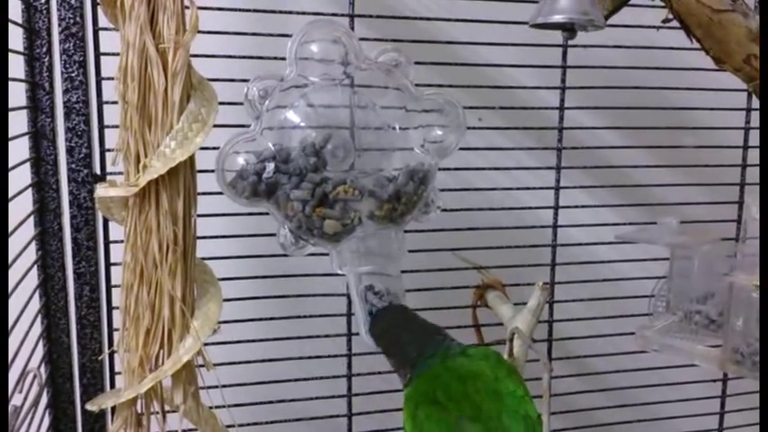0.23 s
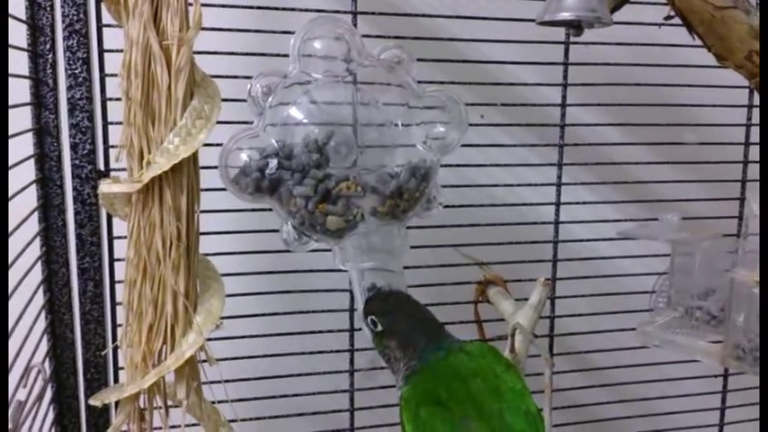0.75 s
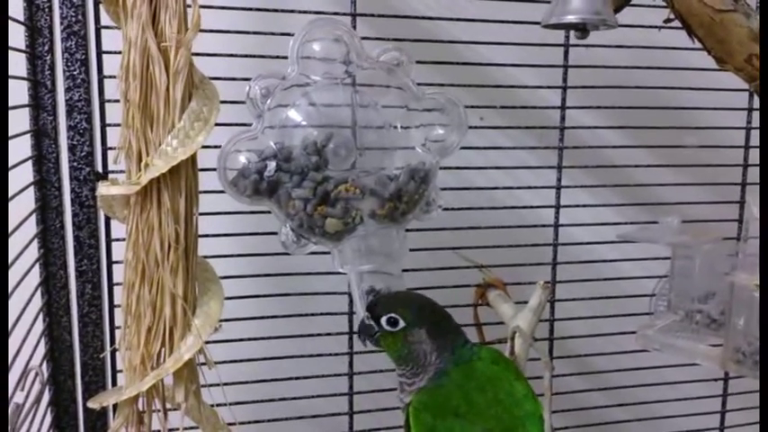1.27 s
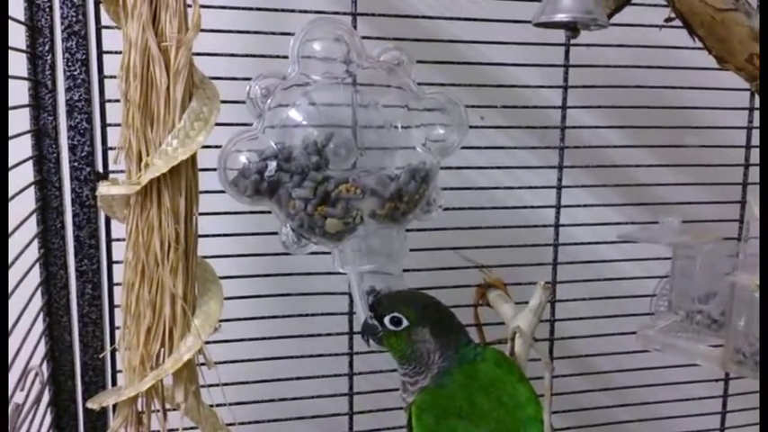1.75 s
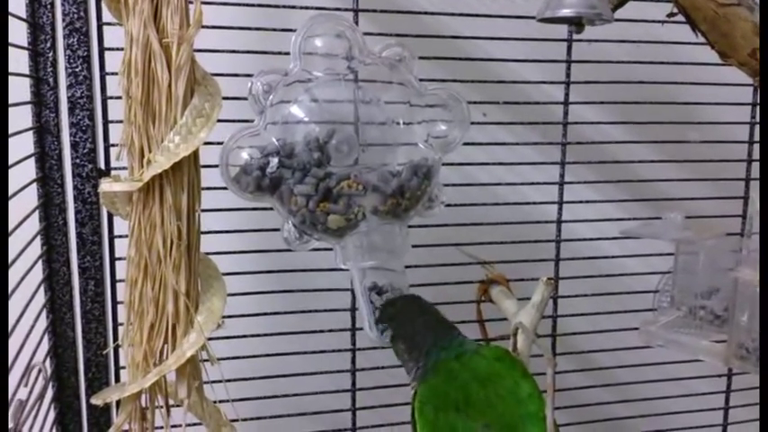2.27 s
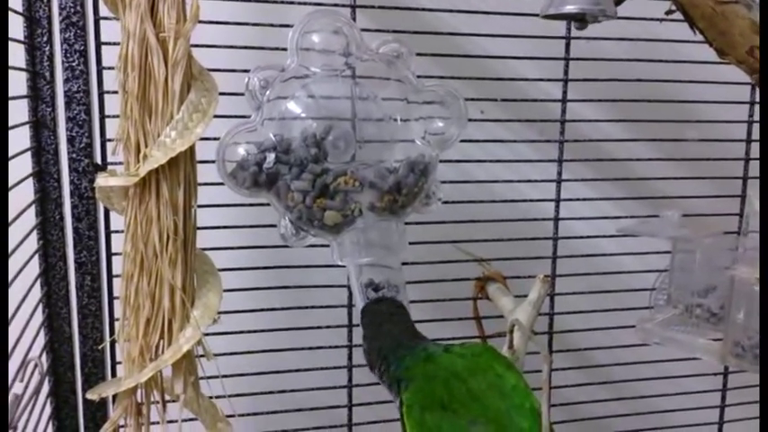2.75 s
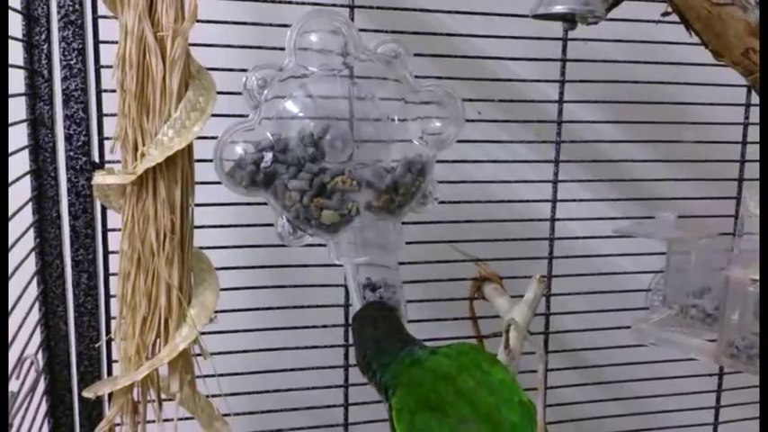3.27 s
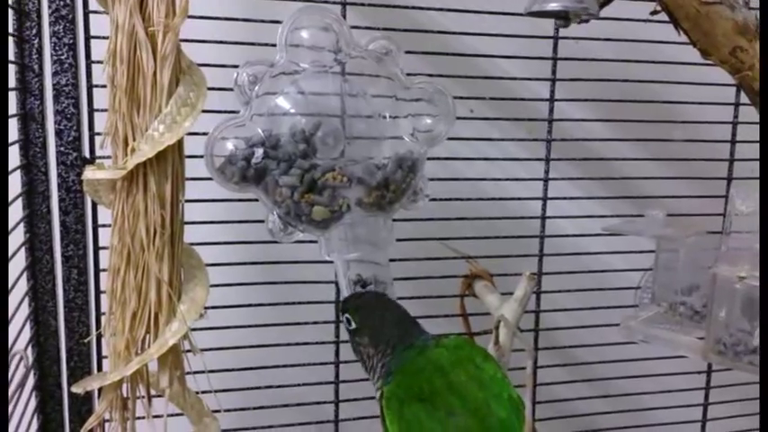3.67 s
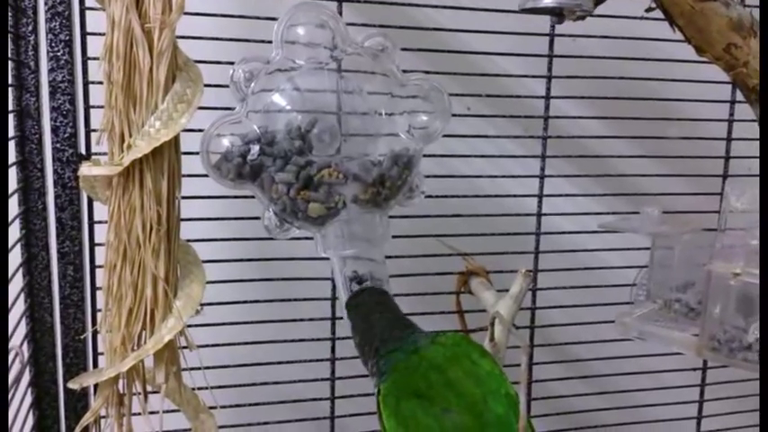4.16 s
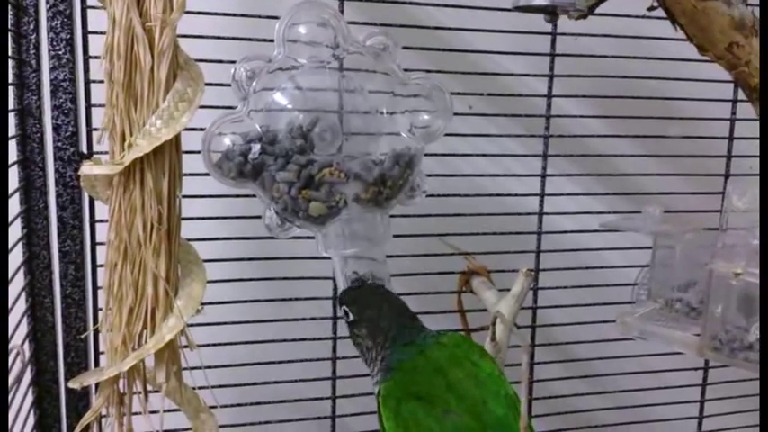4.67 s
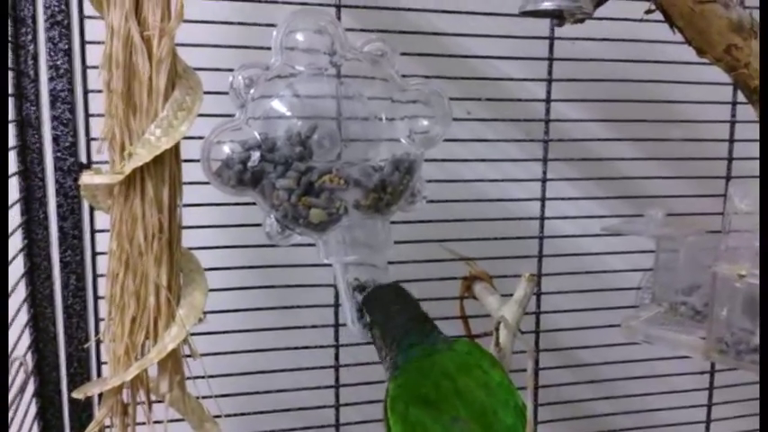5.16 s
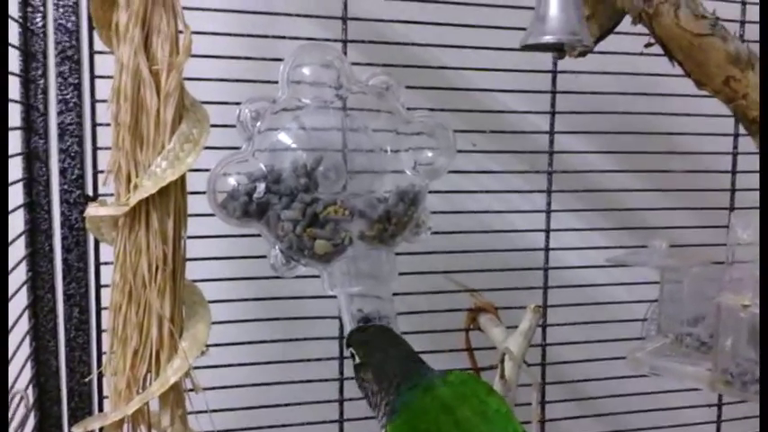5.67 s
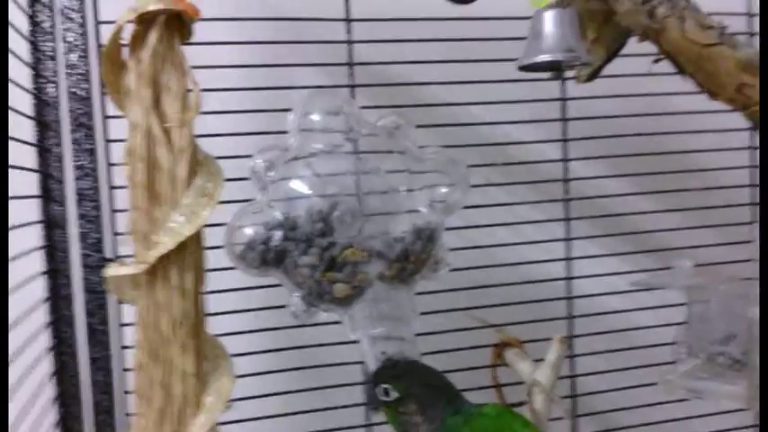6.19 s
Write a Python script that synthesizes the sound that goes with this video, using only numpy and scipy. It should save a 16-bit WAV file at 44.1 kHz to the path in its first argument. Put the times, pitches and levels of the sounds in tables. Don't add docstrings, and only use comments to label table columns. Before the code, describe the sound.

A small parrot bites a pellet-filled plastic toy in an indoor cage, gives one harsh squawk, while pellets rattle and wind pops hit the left.

```python
import sys
import numpy as np
from scipy import signal
from scipy.fft import rfft, irfft
from scipy.io import wavfile

SR = 44100
rng = np.random.default_rng(int(sys.argv[2]) if len(sys.argv) > 2 else 0)


def dump(signal):
    limited = np.clip(np.atleast_2d(signal).T, -1, 1)
    pcm = np.round(limited * 32767).astype(np.int16)
    wavfile.write(sys.argv[1], SR, pcm)


def boost_factor(decibels):
    exponent = np.asarray(decibels, float) / 20
    return 10 ** exponent


N = 283541

# time in seconds, level in dB.
DRAUGHT_LEVEL = [(0, -50.5), (.44, -51), (.66, -35), (.99, -43.5), (1.3, -53), (1.9, -54), (2.42, -54),
                 (2.72, -43), (2.97, -58.5), (3.85, -38), (4.07, -50), (4.2, -36.5), (4.4, -34),
                 (4.78, -57), (5.06, -36.5), (5.9, -36), (6.2, -34.5), (6.43, -38.5)]


def rms_one(x):
    return x / np.sqrt(np.mean(x ** 2) + 1e-20)


def filtered(x, order, hz, kind):
    return signal.sosfilt(signal.butter(order, hz, kind, fs=SR, output="sos"), x)


def in_time(rows):
    s, *columns = np.transpose(rows)
    return [np.interp(np.arange(N) / SR, s, c) for c in columns]


def at_hz(points, hz):
    known_hz, db = np.transpose(points)
    return np.interp(np.log(hz + 1), np.log(known_hz), db)


def coloured(x, spectrum):
    gain = boost_factor(at_hz(spectrum, np.fft.rfftfreq(N, 1 / SR)))
    return rms_one(irfft(rfft(x) * gain, N))


def drift(rate):
    r = np.exp(-2 * np.pi * rate / SR)
    slow = signal.lfilter([1], [1, -2 * r, r * r], rng.standard_normal(N + SR))
    return rms_one(slow[SR:])


def ring(x, hz, t60):
    r, w = boost_factor(-60 / (t60 * SR)), 2 * np.pi * hz / SR
    return signal.lfilter([0, np.sin(w)], [1, -2 * r * np.cos(w), r * r], x + 1e-18)


def swells(rows, rise_db_per_s):
    t = np.arange(N) / SR
    levels = [db - np.maximum((s - t) * rise_db_per_s, (t - s) * fall_db) for s, db, fall_db in rows]
    return np.max(levels, axis=0)


def short_notes(table):
    t, out, blur = np.arange(N) / SR, np.zeros(N), drift(420.0)
    for k, (s, db, hz, length, husky) in enumerate(table):
        on = slice(round(s * SR), round((s + length) * SR))
        gone = np.linspace(0, 1, len(t[on]))
        shape = np.minimum(gone * length / .003, 1) * np.sqrt(1 - gone)
        swing = 1 - husky + husky * np.roll(blur, k * SR // 7)[on]
        out[on] += boost_factor(db) * shape * swing * np.sin(2 * np.pi * hz * t[on])
    return out


def place(x, pan_db):
    return np.array([np.roll(x, 20) * boost_factor(pan_db / 2), x * boost_factor(-pan_db / 2)])


def hiss():
    # frequency in Hz, level in dB per Hz.
    hiss_spectrum = [(100, -16), (150, -3.5), (300, -6.5), (700, -7.5), (1500, -12.5), (4000, -18.5),
                     (8500, -19.5), (10500, -17), (11800, -20.5), (12500, -30), (15400, -35.5)]
    level_db = -72 + .4 * (in_time(DRAUGHT_LEVEL)[0] + 45.5)
    return boost_factor(level_db) * coloured(rng.standard_normal((2, N)), hiss_spectrum)


def air_pops(level_db):
    # peak in seconds, peak in dB, width in ms, push +1 or suction -1.
    strong = [(0.616, -33.5, 0.2, -1), (0.698, -46, 0.28, 1), (0.7465, -38, 0.71, -1),
              (0.792, -38, 0.28, 1), (0.874, -23, 1, 1), (2.626, -34, 2.74, 1), (2.6555, -39, 1.16, -1),
              (2.696, -40, 1.2, 1), (2.7565, -39.5, 1.2, 1), (3.41, -37, 1.25, -1), (3.4844, -40, 0.67, -1),
              (3.526, -37.5, 2.9, -1), (3.692, -37, 2.4, -1), (3.834, -35.5, 2.7, -1), (3.916, -37, 1.9, 1),
              (4.214, -30, 0.6, -1), (5.0197, -27, 1.9, -1), (5.156, -33.5, 1.5, -1), (5.1895, -25, 2.4, 1),
              (5.2256, -34.5, 0.89, 1), (5.384, -27, 1.28, -1), (5.657, -35.5, 0.7, 1),
              (5.679, -35, 1.1, -1), (5.8402, -26, 1.93, -1), (5.921, -35.5, 1.5, -1),
              (5.9931, -34.5, 1.8, -1), (6.1478, 1, 0.9, 1), (6.2527, -10, 1.5, 1), (6.325, -31.5, 1.3, 1),
              (6.4159, -12.5, 1.36, 1)]
    small = [(u * N / SR, level_db[int(u * N)] - 6 - 6 * v, 0.62 * (.5 + w), p - .5)
             for u, v, w, p in rng.random((40, 4))]
    pops, t = np.zeros(N), np.arange(-SR // 20, SR // 20) / SR
    for s, db, width_ms, push in strong + small:
        u = t / (max(width_ms, .3) / 1000)
        at = round(s * SR) + np.arange(len(t)) - len(t) // 2
        keep = (at >= 0) & (at < N)
        build = .55 * np.exp(-u * u) + .45 * np.exp((1 - np.sqrt(1 + u * u)) / 4.5)
        overshoot = 0.18 * np.exp(-(u / 2.5 - 1.3) ** 2)
        pop = np.where(u < 0, build, np.exp(-u * u)) - overshoot
        pops[at[keep]] += (np.sign(push) * boost_factor(db - 1.5) * pop)[keep]
    return np.minimum(pops, boost_factor(-5.5))


def draught():
    # start in seconds, peak in dB, pitch in Hz,
    # length in seconds, husky share 0-1.
    whistles = [(2.645, -44.5, 594.4, 0.0097, 0.13), (5.262, -46.5, 495, 0.0055, 0.2),
                (5.625, -46.5, 586, 0.0077, 0), (5.653, -42, 561, 0.0067, 0.1),
                (6.078, -45, 554, 0.012, 0.25), (6.102, -41, 493, 0.0074, 0.33),
                (6.203, -44, 520, 0.0085, 0.33)]
    level_db, = in_time(DRAUGHT_LEVEL)
    swing = filtered(drift(25.0) * boost_factor(1.2 * drift(12.0)), 2, 70, "low")
    swing = rms_one(filtered(swing, 1, 14, "high"))
    rumble = rms_one(filtered(drift(90.0) * boost_factor(5.0 * drift(20.0)), 2, [60, 350], "band"))
    left = air_pops(level_db) + short_notes(whistles)
    left = left + boost_factor(level_db - 17.5) * rumble + boost_factor(level_db + 1.0) * swing
    left = left * np.minimum(np.arange(N, 0, -1) / (.006 * SR), 1)
    right = boost_factor(-34.5) * left + boost_factor(level_db - 13.0) * drift(40.0)
    return np.array([left, right])


def room(x):
    # frequency in Hz, time in seconds.
    fade_times = [(300, 0.68), (1500, .6), (4000, 0.52), (10000, 0.46)]
    size = round(1.2 * SR)
    t, white, tail = np.arange(size) / SR, rng.standard_normal((2, size)), 0
    for hz in 250 * 2 ** np.arange(0, 6.5, .5):
        band = filtered(white, 2, [hz / 2 ** .25, hz * 2 ** .25], "band")
        tail = tail + band * boost_factor(-60 * t / at_hz(fade_times, hz))
    tail = tail * np.clip((t - .008) / 0.031, 0, 1)
    tail = tail / np.sqrt((tail ** 2).sum(axis=1, keepdims=True))
    return signal.fftconvolve(x[None], tail, axes=1)[:, :N]


def cage():
    # pitch in Hz, width of the resonance in Hz, level in dB.
    bars = [(320, 18, -7), (485, 15, -6), (646, 18, -2), (772, 20, -3), (1430, 50, -4), (1790, 20, -8),
            (2370, 40, -3), (3510, 30, -4)]
    # jolt in seconds, thrum in dB, dying in dB per second.
    jolts = [
        (0, -48, 51),
        (.095, -41.5, 122),
        (1.02, -50, 345),
        (1.33, -42.5, 87),
        (4.19, -64.5, 32),
    ]
    shake = rng.standard_normal(N)
    thrum = sum(boost_factor(db) * rms_one(ring(shake, hz, 2.2 / width)) for hz, width, db in bars)
    return boost_factor(swells(jolts, 3002)) * rms_one(filtered(thrum, 4, 280, "high"))


def bell():
    # pitch in Hz, level in dB.
    bell_modes = [(7140, -4.5), (8020, -3), (8950, -20), (10200, -20), (11250, -22), (12050, -23)]
    # touch in seconds, level in dB.
    touch_rows = [
        (5.492, -50.5),
        (5.512, -55.5),
        (5.535, -65),
    ]
    touches = np.zeros(N)
    for s, db in touch_rows:
        touches[round(s * SR)] = boost_factor(db)
    return sum(boost_factor(db) * ring(touches, hz, .2) for hz, db in bell_modes)


def pellets():
    # frequency in Hz, level in dB per Hz.
    rattle_spectrum = [(650, -35), (1100, -13.5), (2420, -5.5), (3780, -4), (4310, -9), (5430, -14.5),
                       (7210, -14.5), (10300, -24.5), (11700, -39), (15000, -39.5)]
    # peak in seconds, rattle in dB, settling in dB per second.
    tips = [
        (0.0, -38.5, 55.5),
        (0.81, -30.5, 42),
        (1.0, -21, 164),
        (1.2, -38, 61),
        (1.385, -31, 147.5),
        (3.63, -46.5, 139),
        (4.3, -66, 31.5),
        (5.2, -64, 24.5),
        (5.59, -53.5, 61),
    ]
    level_db = np.maximum(swells(tips, 202.5), -80)
    strength = boost_factor(2.2 * np.minimum(rng.exponential(1, N), 5))
    hit = rng.random(N) < 2500 / SR
    grains = strength * rng.choice([-1, 1], N) * hit
    return boost_factor(level_db - 10) * coloured(grains, rattle_spectrum)


def rasps():
    # start in seconds, peak in dB, length in seconds, tilt in dB per octave, husky share 0-1.
    strokes = [
        (1.144, -41, .09, -5, 0.62),
        (5.345, -73, 0.11, -0.5, 0.8),
        (5.491, -55, 0.104, -1, 0.82),
    ]
    # band of the stem in Hz, level in dB.
    stem_bands = [(1830, -10.5), (2450, 1), (3430, 1), (4500, 6), (5400, -3), (7200, 0)]
    pivot_hz = stem_bands[1][0]
    return short_notes([(s, db + rel_db + tilt_db * np.log2(hz / pivot_hz), hz, length, husky)
                        for s, db, length, tilt_db, husky in strokes for hz, rel_db in stem_bands])


def ringing_notes():
    # start in seconds, peak in dB, pitch in Hz, length in seconds, husky share 0-1.
    tone_rows = [(.305, -48, 3850, 0.0088, 0.64), (.342, -45, 3400, 0.013, 0.5),
                 (.86, -29.5, 2450, 0.072, 0.46), (.92, -36.5, 1485, 0.037, 0.23),
                 (.93, -28, 2964, 0.055, 0.64), (.965, -49, 1010, 0.017, 0.1),
                 (1.317, -47.5, 5260, 0.033, 0.76), (1.317, -47, 7250, 0.037, 1),
                 (2.508, -60.5, 860, 0.032, 0.24), (2.51, -57, 1420, 0.0089, 0.5),
                 (2.861, -57, 2703, 0.006, 0.7), (2.855, -55, 1422, .006, 0.42),
                 (3.567, -51.5, 1400, .012, 0.5), (3.73, -71, 13300, 0.073, .8),
                 (3.732, -70, 7740, 0.1, 0.9), (3.757, -53.5, 2670, 0.0071, 1),
                 (5.149, -61, 1035, 0.059, 0.52), (1.165, -43.5, 2509, .03, 0),
                 (5.925, -70, 828, 0.038, 0.45), (6.115, -62, 1808, 0.021, 0.9), (5.2, -70, 1140, .15, .5),
                 (5.34, -67, 1377, 0.084, 0.88), (5.436, -72.5, 9840, 0.11, .7),
                 (6.354, -74, 7200, 0.05, 0.55)]
    return short_notes(tone_rows)


def chirrup():
    start_s, gap_s, pulse_s = 3.663, .0232, .011
    start_hz, fall_hz_per_s = 1600, 20000
    out, t = np.zeros(N), np.arange(round(pulse_s * SR)) / SR
    pulse = np.sqrt(np.sin(np.pi * t / pulse_s))
    pulse = pulse * np.sin(2 * np.pi * (start_hz - fall_hz_per_s * t / 2) * t)
    for k in range(5):
        at = round((start_s + gap_s * k) * SR)
        out[at:at + len(t)] = boost_factor(-41 - 1.1 * (k - 3.45) ** 2) * pulse
    return out


def clicks():
    # lowest in Hz, highest in Hz, time to fade by 60 dB in seconds.
    shell_groups = [(2600, 6000, .005), (400, 900, .02), (1150, 2100, .009), (6000, 13000, .003)]
    # time in seconds, peak in dB, then hollow, body and crack in dB.
    bites = [(0.0832, -27.5, -11.5, -3.5, -9.5), (0.2268, -44.5, -31, 3, -11),
             (0.3639, -44.5, -30, -2, -1.5), (0.9404, -18, -48, -33, -26.5), (1.014, -26.5, -14.5, 2.5, -6),
             (1.1041, -28.5, -48, -8, -32.5), (1.3383, -26, -33, -10, -14),
             (1.3938, -27.5, -15, -37, -32.5), (2.813, -54.5, -21, -24, -16),
             (2.861, -56, -23.5, -4, -27.5), (2.9021, -64.5, -21, 1, 12), (3.405, -31, -20, -3.5, -13),
             (3.568, -51, -23, -24, -9), (3.601, -31, -23, -9, -17), (3.973, -49.5, -22, -10.5, -3.5),
             (4.1815, -24.5, -15, -2, -12.5), (4.4275, -45.5, -1.5, 3.5, -27),
             (4.6144, -33.5, -40.5, -18.5, -18), (4.825, -60.5, -16, 5, 4.5),
             (5.1248, -33.5, -35, -39, -13.5), (5.5786, -31.5, -33, -21, -12.5)]
    # time in seconds, peak in dB, body in dB, crack in dB.
    knocks = [(0.2778, -39, -9, -39), (0.3077, -50.5, -10, -18.5), (0.342, -45, 4, -8),
              (0.574, -60.5, 10.5, -16.5), (1.3188, -32.5, -32.5, -8), (1.706, -65, -5, 12),
              (4.3895, -58, -3.5, -4), (4.4826, -52, 2, -7), (4.6011, -47, -1.5, -10),
              (4.675, -49.5, 2, -15)]
    hits = [(*row, -16.5) for row in bites]
    hits += [(s, db, -6, *rest, -7.5) for s, db, *rest in knocks]
    out, spread, size = np.zeros((2, N + SR)), np.zeros(N + SR), SR // 8
    t = np.arange(size) / SR
    for s, db, *groups_db, pan_db in hits:
        crunch = rng.standard_normal(size) * np.exp(-t / 0.0079) * (rng.random(size) < .25)
        bite, at = 0, round(s * SR)
        for (low_hz, high_hz, t60), rel_db, sign in zip(shell_groups, [0] + groups_db, [1, 1, -1, -1]):
            modes_hz = low_hz * (high_hz / low_hz) ** ((np.arange(8) + rng.random(8)) / 8)
            group = sum(ring(crunch, hz, t60) for hz in modes_hz)
            group, even = filtered([group, t == 0], 2, [low_hz, high_hz], "band")
            group = boost_factor(db + rel_db - 2.0) * group / np.abs(group).max()
            bite = bite + group
            spread[at:at + size] += sign * rms_one(even) * np.std(group) * boost_factor(-pan_db / 4)
        out[:, at:at + size] += place(bite * (t < .12), pan_db)
    return out[:, :N], spread[:N]


def squawk():
    # time in seconds, level in dB, breath share 0-1, second membrane in dB.
    effort = [(.607, -56.5, 0.1, -47.5), (.623, -24, 0.5, -40.5), (.638, -18, 0.33, -20),
              (.655, -19, 0.84, 2), (.69, -17.5, 0.35, 2), (.705, -14, 0.5, -11.5),
              (.755, -16.5, 0.58, -5.5), (.795, -22, 1, -1.5), (.86, -29, 0.5, -6)]
    # multiple of its pitch, level in dB.
    first_orders = [(1, -25), (2, -9), (3, -2), (4, -7.5), (5, -13.5), (6, -8), (7, -20), (8, -14.5),
                    (9, -27), (10, -27.5), (11, -30.5)]
    second_orders = [(2, -20), (4, -6), (5, -5.5), (7, -9.5), (8, -12.5), (10, -7.5)]
    # frequency in Hz, level in dB per Hz.
    throat = [(530, -87), (900, -51.5), (1220, -25), (2200, -12.5), (2450, -16), (3400, -1), (3700, 0.5),
              (4510, -4.5), (6820, -11), (7490, -8), (15000, -41)]
    level_db, breath, second_db = in_time(effort)
    start_s, end_s, t = effort[0][0], effort[-1][0], np.arange(N) / SR
    since = np.maximum(t - start_s, 0)
    tightness = 1 + 0.13 * since - .15 * np.exp(-since / .005)
    wobble_hz = 11 * np.array([drift(55.0), drift(70.0)])
    pitches_hz = np.outer([1220, 779.6], tightness) + wobble_hz
    phase, phase_two = 2 * np.pi * np.cumsum(pitches_hz, axis=1) / SR
    first = rms_one(sum(boost_factor(db) * np.sin(k * phase + k * k) for k, db in first_orders))
    second = rms_one(sum(boost_factor(db) * np.sin(k * phase_two + k * k) for k, db in second_orders))
    tone = (first + boost_factor(second_db) * second) * boost_factor(1.5 * drift(130.0))
    air = coloured(rng.standard_normal(N), throat) * boost_factor(2.0 * drift(150.0))
    breath = np.clip(breath, 0, 1)
    sounding = np.clip(np.minimum(t - start_s, end_s - t) / 0.0041, 0, 1)
    call = boost_factor(level_db) * sounding * ((1 - breath) * tone + breath * air)
    return filtered(call, 6, 1050, "high")


def scene():
    call, rattle, thrum, mutter = squawk(), pellets(), cage(), chirrup()
    bites, spread = clicks()
    tones = ringing_notes() + rasps() + bell()
    near = place(call, -12.5) + bites + place(tones + mutter, -15.5)
    near = near + place(rattle, -11.0) + place(thrum, -3.0)
    to_room = boost_factor(0.5) * call + boost_factor(-6) * spread + boost_factor(-1.0) * tones
    to_room = to_room + boost_factor(-8) * mutter
    to_room = to_room + boost_factor(-2.0) * rattle + boost_factor(-6.0) * thrum
    tail = room(to_room) * boost_factor([[-3.5], [3.5]])
    return near + tail + draught() + hiss()


def band_limit(x):
    return signal.sosfilt(signal.butter(12, 15560, fs=SR, output="sos"), x)


def record(dry):
    mix = np.clip(dry, -1, 1)
    return band_limit(mix)


dry = scene()
out = record(dry)
dump(out)
```